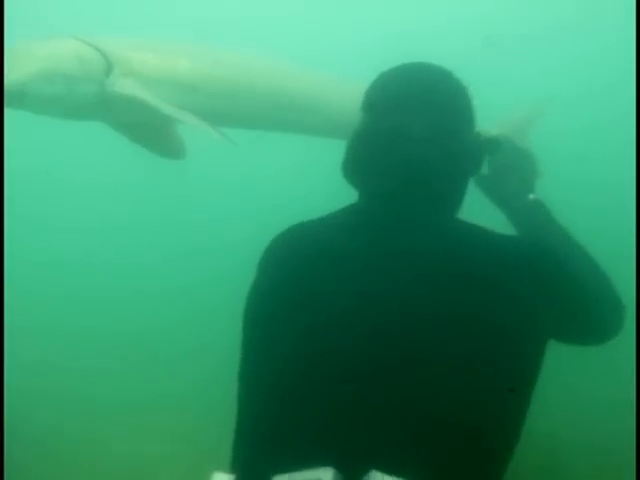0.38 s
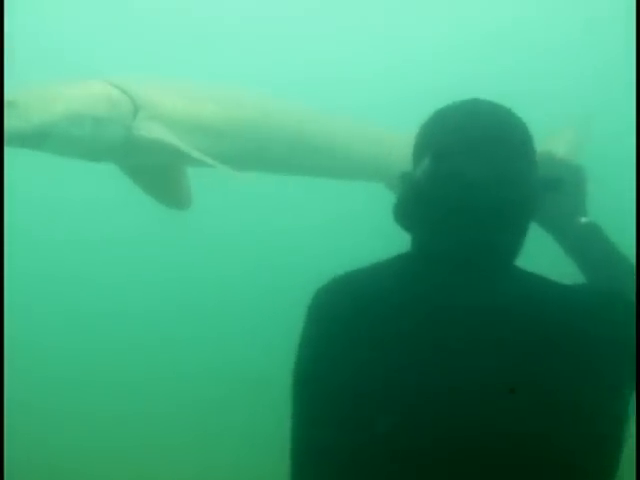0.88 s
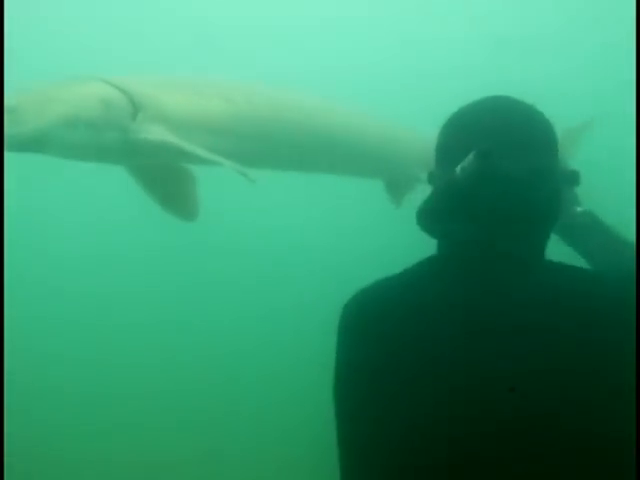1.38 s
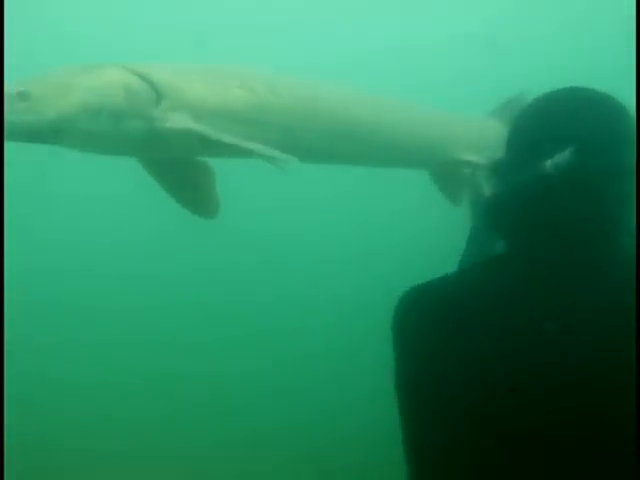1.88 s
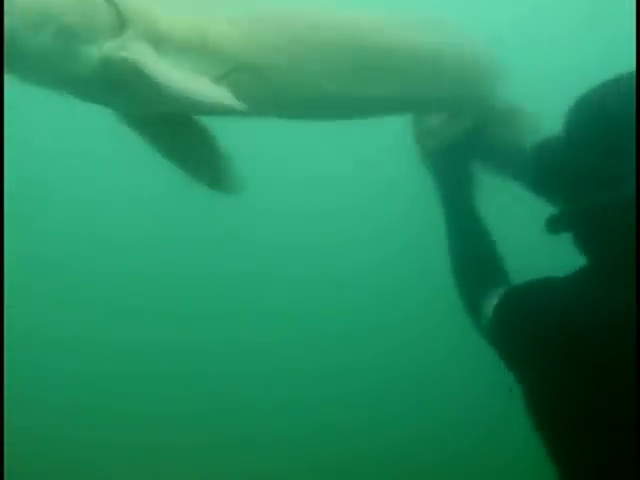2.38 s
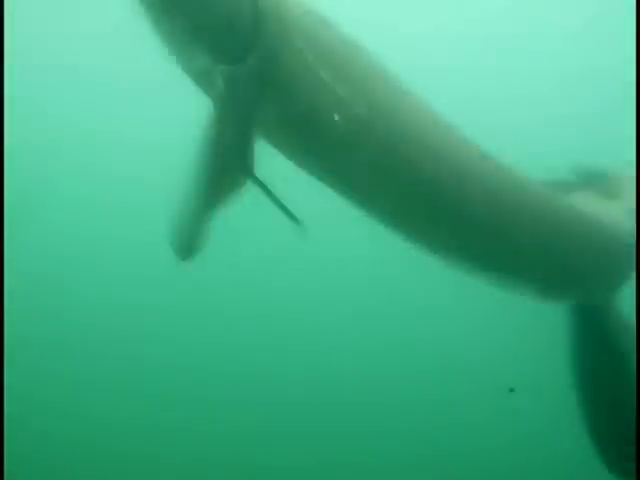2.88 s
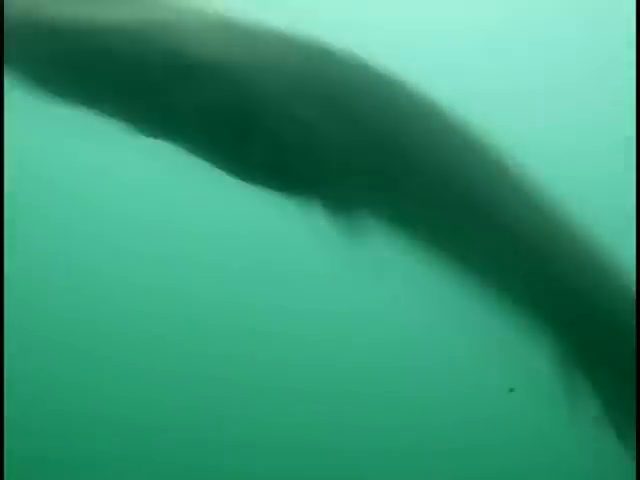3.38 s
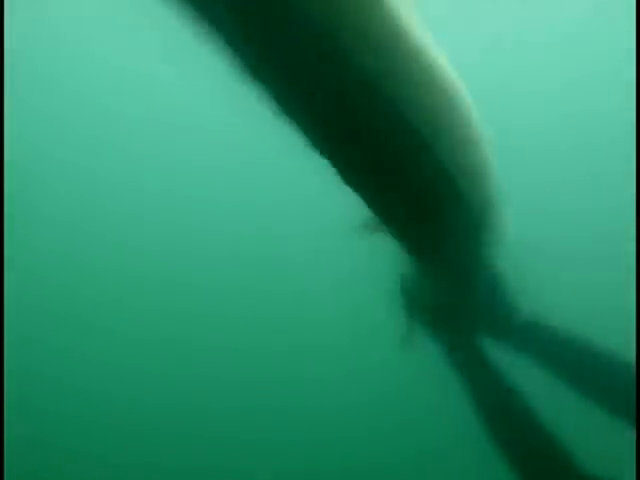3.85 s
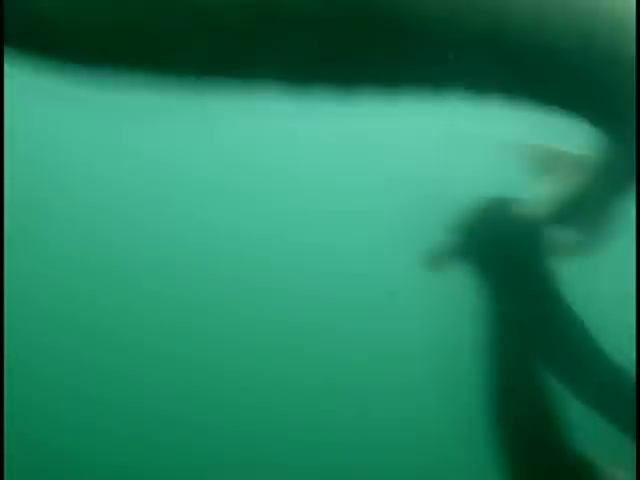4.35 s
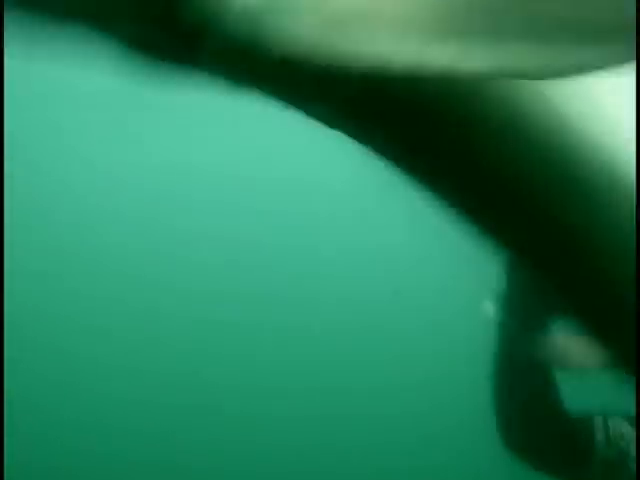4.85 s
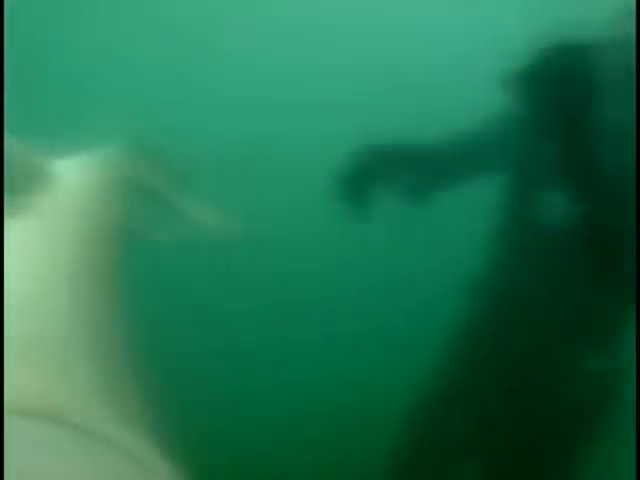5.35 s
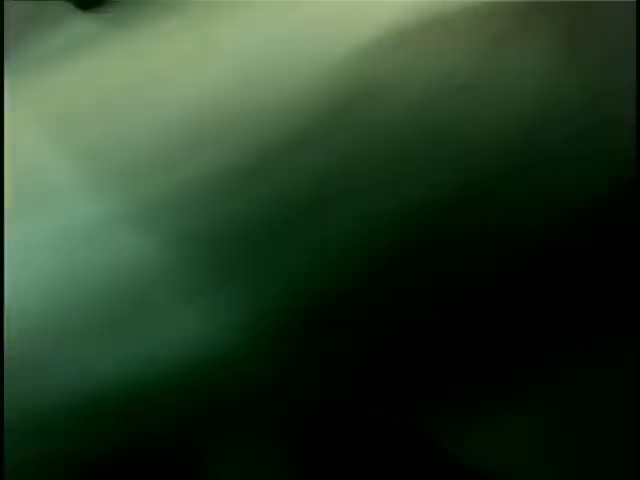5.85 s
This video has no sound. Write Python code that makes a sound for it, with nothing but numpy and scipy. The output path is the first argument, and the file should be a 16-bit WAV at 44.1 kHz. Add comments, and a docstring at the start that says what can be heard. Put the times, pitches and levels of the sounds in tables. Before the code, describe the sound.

Near-silent underwater hiss and faint whine give way to small clicks and bubbly plinks, then hard, distorted bumps and scrapes on a camera's casing.

```python
"""Under water, in a sealed camera housing beside a diver holding a large thrashing fish.
At first mostly the microphone's hiss, a thin electronic whine and slow surges, all coloured noise and a sine;
then the housing is ticked, rubbed, scraped and shoved harder and harder: rough forces ring its modes,
over faint random ticks all through. Bubbles, small pings of the housing's shell, and a fizz of tiny
bubbles are fading sines whose pitch wavers; shoves and the low ringing after the hardest are plainer ones."""
import sys
import numpy as np
from scipy import signal
from scipy.fft import rfft, irfft, next_fast_len
from scipy.io import wavfile
from scipy.ndimage import uniform_filter1d, map_coordinates

SR = 44100
rng = np.random.default_rng(int(sys.argv[2]) if len(sys.argv) > 2 else 0)


def field_ratio(decibels):
    """Amplitude ratio for a level in dB (20 dB per decade); scalars and array-likes work."""
    return 10 ** (np.asarray(decibels, dtype=float) / 20)


def to_wav(s):
    """Save 16-bit WAV."""
    ch = np.atleast_2d(s).T  # columns
    pcm = np.round(np.clip(ch, -1, 1) * 32767)  # PCM
    wavfile.write(sys.argv[1], SR, pcm.astype(np.int16))


N = 263718

# light handling under the strokes: (t/s, strength/dB)
HANDLING = [(2.4, -96), (2.53, -83), (2.6, -75.5), (2.7, -71.5), (2.88, -74.5), (3.05, -72), (3.18, -76.5),
            (3.45, -71), (3.78, -69), (4.03, -71.5), (4.3, -57), (4.37, -55.5), (4.52, -67), (4.81, -63),
            (5.0, -70), (5.23, -71.5), (5.4, -47), (5.56, -54), (5.64, -49), (5.89, -58.5), (5.96, -40)]
# shoves against the housing, and the low ringing after the hardest ones:
# (t/s, level/dB, f/Hz, time to fade by 60 dB/s)
SHOVES_AND_RINGING = [(2.127, -51, 101, 0.13), (3.115, -48.5, 70, 0.13), (3.57, -44, 128, 0.055),
                      (3.581, -46.5, 323, 0.085), (3.592, -42, 100, 0.12), (4.885, -41, 145, 0.053),
                      (5.081, -40.5, 108, 0.087), (5.28, -10.5, 175, 0.049), (5.28, -12.5, 420, 0.03),
                      (5.437, -22, 189.6, 0.19), (5.3, -26.5, 205, 0.07), (5.424, -0.5, 450, 0.012),
                      (5.427, -22, 71, 0.13), (5.877, -19.5, 203, 0.0079), (5.9124, -8, 95, 0.018),
                      (5.929, -10, 480, 0.013)]


def unit(x):
    """Scales x to rms 1."""
    return x / np.sqrt(np.mean(x ** 2) + 1e-20)


def curves(rows):
    """Joins the rows by straight lines: one value per sample for each column after the time."""
    s, *cols = np.transpose(rows)
    return [np.interp(np.arange(N) / SR, s, c) for c in cols]


def filtered(x, response):
    """Filters x by a complex response of frequency."""
    m = next_fast_len(N + SR // 4)
    hz = np.fft.rfftfreq(m, 1 / SR)
    return irfft(rfft(x, m) * response(hz), m)[:N]


def coloured(spectrum):
    """Noise of rms 1 with a given spectrum."""
    f, db = np.transpose(spectrum)

    def response(hz):
        return field_ratio(np.interp(np.log(hz + 1), np.log(f), db))
    return unit(filtered(rng.standard_normal(N), response))


def patchy(depth_db):
    """Noise of rms 1 whose colour changes every few ms, as when a point of contact moves."""
    z = signal.stft(rng.standard_normal(N), nperseg=256)[2]
    field = uniform_filter1d(rng.standard_normal(z.shape), size=4, axis=0)  # smooth over frequency
    field = uniform_filter1d(field, size=3, axis=1)  # and over time
    return unit(signal.istft(z * field_ratio(depth_db * unit(field)), nperseg=256)[1][:N])


def jolts(rate, spread_db, last):
    """Stick and slip: uneven jolts of a few ms, rms 1; rate is per second, last is in seconds."""
    kicks = (rng.random(N) < rate / SR) * field_ratio(spread_db * rng.standard_normal(N))
    t = np.arange(SR // 40) / SR
    jolt = t / last * np.exp(-t / last)
    return unit(signal.fftconvolve(kicks, jolt)[:N])


def ring(force, modes, blows=0):
    """A random force of the given envelope, and any clean blows, ring the modes; steady force 1 gives rms 1."""
    def response(f):
        h = 0
        for k, (centre, width, db) in enumerate(modes):
            resonance = 1j * f * width / (centre * centre - f * f + 1j * f * width)
            h = h + (-1) ** k * field_ratio(db) * resonance  # neighbours have opposite signs
        h = h / (1 + 1j * f / modes[-1][0]) ** 2  # little passes above the highest mode
        return h / np.sqrt(np.mean(abs(h) ** 2))
    return filtered(force * patchy(depth_db=3.3) + blows, response)


def damped(rows, attack, glide, waver):
    """Decaying sines with a soft start and a gliding pitch; waver (radians) makes pitch and level wander."""
    out, t = np.zeros(N + SR), np.arange(SR // 4) / SR
    knots = rng.standard_normal((len(rows), 2, 24))
    for (s, db, hz, t60), wander in zip(rows, knots):
        turn, swell = (waver * map_coordinates(v - v[0], [t * 80]) for v in wander)  # 80 knots a second
        phase = 2 * np.pi * hz * t * (1 + glide * t / t60) + turn
        tone = np.sin(phase) * (1 - np.exp(-t * hz / attack))  # attack is in cycles
        out[round(s * SR):][:len(t)] += field_ratio(db - 60 * t / t60 + 2 * swell) * tone
    return out[:N]


def microphone_hiss():
    """The microphone's own steady noise."""
    # spectrum of the hiss: (f/Hz, relative level per Hz/dB)
    hiss = [(20, -32), (58, -40), (128, -3.5), (224, -7), (616, -4.5), (2440, -13.5), (5500, -15),
            (6700, -17.5), (10500, -19), (11600, -33), (13000, -23), (15600, -28), (16200, -44)]
    return field_ratio(-66) * coloured(hiss)  # rms level in dB


def electronic_whine():
    """The electronics give a thin steady sine."""
    # the whine: (f/Hz, rms level/dB)
    hz, db = (5880, -78)
    return np.sqrt(2) * field_ratio(db) * np.sin(2 * np.pi * hz * np.arange(N) / SR)


def surge():
    """The flow, and a wake at each shove or ringing, sway the housing and make its trapped air boom."""
    # water flowing round the housing: (t/s, flow/dB)
    flow = [(0, -89), (0.9, -76), (1.15, -75), (1.32, -77), (1.9, -75), (2.11, -72), (2.41, -78),
            (2.75, -68.5), (4.05, -74), (4.3, -54), (4.56, -63), (4.68, -56), (4.83, -71), (5.15, -60.5),
            (5.36, -33.5), (5.56, -54.5), (5.73, -41.5), (5.84, -63), (5.98, -53)]
    # spectrum of the sway: (f/Hz, relative level per Hz/dB)
    swell = [(15, 2.5), (45, -4), (80, -10), (130, -55), (300, -90)]
    # modes of the housing and of the air trapped in it: (f/Hz, width/Hz, relative level/dB)
    air = [(107, 58, -4), (166, 51, 0.5), (283, 380, -3)]
    wake_db, wake_rise_s, wake_t60_s = -18, 0.0053, 0.11  # wake_db is relative to the row's level
    sway_s, sway_db, sway_power = 0.17, -15.5, 0.73
    still_boom_db = -73.5  # the trapped air never falls quiet
    t, push = np.arange(N) / SR, field_ratio(curves(flow)[0])
    for s, db, *_ in SHOVES_AND_RINGING:
        since = np.clip(t - s, 0, None)
        rise = 1 - np.exp(-since / wake_rise_s)
        push = push + field_ratio(db + wake_db - 60 * since / wake_t60_s) * rise
    # the heavy housing follows the push slowly and less than in proportion
    sway = abs(uniform_filter1d(push, round(sway_s * SR))) ** sway_power
    boom = np.hypot(push, field_ratio(still_boom_db)) * unit(ring(1, air))
    return field_ratio(sway_db) * sway * coloured(swell) + boom


def fizz():
    """Tiny bubbles squeezed out by the handling: rows for short pips at random moments."""
    pips_per_s, middle_hz, fade_cycles = 60, 3000, 70
    loudest_db, spread_db = 19, 12  # the loudest pip over the handling, and the range below it
    when, pitch, size = rng.random((round(pips_per_s * N / SR), 3)).T
    s = when * N / SR
    db = np.interp(s, *np.transpose(HANDLING)) + loudest_db - spread_db * size
    hz = middle_hz * 2 ** (2 * pitch - 1)  # up to an octave either way
    return list(zip(s, db, hz, fade_cycles / hz))


def bubbles_and_pings():
    """Bubbles, small pings of the housing's shell, and fizz: fading sines, sinking and wandering in pitch."""
    # bubbles and small pings of the shell: (t/s, level/dB, f/Hz, time to fade by 60 dB/s)
    rings = [(1.165, -55, 289, 0.22), (1.115, -52, 170, 0.047), (1.222, -47.5, 282, 0.052),
             (1.431, -46.5, 289, 0.089), (2.166, -45, 1870, 0.012), (2.51, -54, 950, 0.13),
             (2.566, -50, 3180, 0.04), (3.275, -54.5, 1205, 0.11), (3.36, -52, 2100, 0.024),
             (3.425, -54, 2850, 0.096), (3.909, -44.5, 3170, 0.02), (5.050, -44.5, 2910, 0.031),
             (5.150, -42.5, 2975, 0.012), (2.81, -43.5, 423, 0.044), (3.388, -46.5, 290, 0.065),
             (3.678, -51.5, 1045, 0.22), (3.726, -44, 1107, 0.14), (3.726, -42, 1423, 0.1),
             (3.806, -45, 660, 0.054), (3.860, -44, 650, 0.12), (3.860, -40.5, 1280, 0.08),
             (3.868, -50, 897, 0.23), (3.81, -53, 816, 0.11), (3.727, -51, 2010, 0.033),
             (3.958, -51.5, 1060, 0.13), (4.446, -26.5, 467, 0.074), (4.618, -34.5, 950, 0.037)]
    return damped(rings + fizz(), attack=0.22, glide=-0.07, waver=0.3)


def shoves_and_ringing():
    """Shoves, and the low ringing after the hardest ones, are fading sines that sink in pitch."""
    return damped(SHOVES_AND_RINGING, attack=0.02, glide=-0.1, waver=0)


def colour(base_db, db, bright_db):
    """How a contact shares its force between case, shell, rasp and squeak, in dB."""
    # share of the brightness for case, shell, rasp, squeak: [dB per dB]
    # a bright contact skips the case and feeds the rasp and squeak
    bright_share = [-0.92, 0.21, 0.53, 0.73]
    middling_db = -42
    # firm pressure damps rasp and squeak: dB lost per dB above middling
    loss = np.array([[0], [0], [0.2], [0.31]])
    shared = np.array(base_db) + np.array(bright_share) * bright_db
    return shared[:, None] - loss * (db - middling_db)


def faint_tick_power():
    """Faint random ticks all through, whether or not the housing is handled; they feed the rasp modes only."""
    power = np.zeros((4, N))
    power[2] = field_ratio(2 * -82) * jolts(35, spread_db=2, last=.002) ** 2
    return power


def handling_power():
    """Light handling drags unevenly over the surface."""
    # case, shell, rasp, squeak against the strength of a middling contact: [dB]
    base_db = [1.5, -2.5, -6.5, -21.5]
    t = np.arange(N) / SR
    strength_db, = curves(HANDLING)
    drag = (t > HANDLING[0][0]) * (1 + .55 * jolts(110, spread_db=3, last=.0015))
    return field_ratio(2 * (strength_db + colour(base_db, strength_db, 0))) * drag ** 2


def stroke_power():
    """Scraping strokes press with a changing strength, roughened by stick and slip."""
    # scraping strokes: (t/s, length/ms, strength at start/dB, strength at end/dB, brightness/dB)
    strokes = [(2.509, 58, -70.5, -70, -12.5), (2.621, 27, -59.5, -64, -3), (2.685, 68, -68, -70, -10.5),
               (2.797, 14.7, -48.5, -56, -2.5), (3.251, 33, -65.5, -63, 3), (3.413, 23, -53, -60, 7),
               (4.073, 70, -54.5, -66, 3), (4.137, 85, -48, -52.5, 8.5), (4.204, 34, -49, -38, -1.5),
               (4.235, 37, -38.5, -37.5, 2), (4.272, 21, -36, -55, -4), (4.414, 36, -49, -40, -2),
               (4.449, 36, -35.5, -51, -1.5), (4.593, 37, -50.5, -58, 12.5), (4.799, 36, -54, -61.5, -8),
               (5.201, 58, -41, -50.5, -2.5), (5.256, 25, -39, -37, -10.5), (5.2797, 21.3, -19, -21.5, 1),
               (5.308, 22.5, -37, -36.5, -4), (5.335, 47, -49, -46, -6.5), (5.4235, 44.6, -21, -25, 2),
               (5.4705, 29.6, -35, -47, -1), (5.6023, 12.3, -36, -28, 6.5), (5.655, 62, -46.5, -30, 1),
               (5.697, 53.6, -25, -24, 0.5), (5.757, 44, -34.5, -42, 5.5), (5.799, 32, -35, -30.5, 3.5),
               (5.8427, 9.2, -28.5, -43, -6), (5.897, 11, -38, -54, -13.5), (5.9119, 26.8, -29, -29, -3.5)]
    # case, shell, rasp, squeak against the strength of a middling contact: [dB]
    base_db = [-0.5, 0, -5.5, -14]
    t, power = np.arange(N) / SR, np.zeros((4, N))
    for start, ms, first_db, last_db, bright_db in strokes:
        end = start + ms / 1000
        k = slice(round(start * SR), min(round(end * SR) + 400, N))
        db = np.interp(t[k], [start, end], [first_db, last_db])
        db -= 3000 * np.clip(t[k] - end, 0, None)  # let go: 3 dB per ms
        db -= 15 * np.exp((start - t[k]) / .001)  # the skin lands within a few ms
        power[:, k] += field_ratio(2 * (db + colour(base_db, (first_db + last_db) / 2, bright_db)))
    return power * unit(1 + .4 * jolts(500, spread_db=2.5, last=.0007)) ** 2


def tick_force():
    """A hard contact is a burst of grit with a clean blow inside it that rings case and shell."""
    # short hard contacts: (t/s, strength/dB, brightness/dB)
    ticks = [(0.932, -44.5, -7), (1.042, -50.5, -9), (1.1304, -47.5, -9), (2.5221, -41, -6),
             (2.627, -37, -5), (2.6332, -34, 0), (2.679, -43.5, 14.5), (2.7872, -42.5, -13),
             (2.8453, -37, 14), (2.9239, -42, -5.5), (2.94, -48, -2), (3.002, -38, -1), (3.0269, -40.5, 0),
             (3.497, -44, 1), (3.6524, -41, -3), (3.72, -41.5, 1), (3.7905, -46, 9), (3.858, -46.5, 7),
             (4.067, -49, 12), (4.129, -33.5, 11), (4.2721, -11.5, -2), (4.3773, -37.5, 0),
             (4.606, -34, -5), (4.6189, -29.5, 3), (4.671, -39.5, -5), (4.726, -35, 10), (4.7578, -42, -3),
             (4.792, -31.5, -2), (4.984, -39, -2), (5.006, -37, -7), (5.078, -28, -2), (5.124, -54, 29),
             (5.183, -38.5, 3), (5.2073, -27, 8.5), (5.2363, -24, -6), (5.2599, -21.5, -15),
             (5.2892, -2, 0), (5.3075, -10, -3), (5.318, -15.5, -1), (5.382, -23.5, -1), (5.393, -28, 0),
             (5.4245, -3, -8.5), (5.4382, -11, -4), (5.4468, -10, -11), (5.451, -20, -7), (5.464, -24, -3),
             (5.4812, -13.5, 1.5), (5.4965, -19.5, 3), (5.6021, -6.5, 7), (5.6588, -24, 10),
             (5.67, -16.5, -5), (5.6908, -3.5, -1), (5.7246, -4, -1.5), (5.738, -6.5, 16),
             (5.758, -15.5, 22.5), (5.8, -21, 1), (5.898, -28, -17.5), (5.9283, -14.5, -8),
             (5.9356, -14.5, 11.5)]
    # case, shell, rasp, squeak against the strength of a middling contact: [dB]
    base_db = [-17, -13.5, -9, -32]
    blow_db = 17  # the blow over the grit
    u = np.arange(SR // 50) / SR / 0.00086
    burst = (u * np.exp(1 - u)) ** 2  # the contact lasts about 4 ms
    power, blows = np.zeros((4, N)), np.zeros((4, N))
    sides = rng.choice([-1, 1], len(ticks))  # push or pull
    for (s, db, bright_db), side in zip(ticks, sides):
        k = round((s - .0004) * SR)
        shared_db = db + colour(base_db, db, bright_db)
        power[:, k:k + len(u)] += field_ratio(2 * shared_db) * burst
        blows[:2, round(s * SR)] = side * field_ratio(blow_db + shared_db[:2, 0])
    return power, blows


def contacts():
    """Strokes, ticks and handling all drive the case, the shell, and the rasp and squeak of the surface."""
    # modes of the housing, low to high, in four groups: (f/Hz, width/Hz, relative level/dB)
    case = [(343, 160, -7), (450, 64, 3), (700, 190, -1), (950, 152, 3), (1447, 435, -0.5)]
    shell = [(1540, 125, 5.6), (2306, 430, 6.8), (2850, 233, 12.2), (3496, 570, 8.93), (5030, 2360, 1.6)]
    rasp = [(5290, 840, -1), (6870, 1600, -0.5), (8540, 1500, 3), (10230, 1620, -0.5), (14370, 1000, -8)]
    squeak = [(8350, 350, 0)]
    grit, blows = tick_force()
    power = faint_tick_power() + handling_power() + stroke_power() + grit
    groups = zip(power, blows, (case, shell, rasp, squeak))
    return sum(ring(np.sqrt(abs(p)), modes, b) for p, b, modes in groups)


def scene():
    """The surge of the water, bubbles and pings, shoves and their ringing, and the contacts."""
    return (surge() + bubbles_and_pings() + shoves_and_ringing() + contacts())[None]


def top_cut(x):
    """Nothing passes above the cut-off."""
    return signal.sosfilt(signal.butter(12, 16820, fs=SR, output="sos"), x)


def record(dry):
    """The microphone adds its hiss, the electronics a thin steady whine; the hardest blows saturate."""
    wet = dry + microphone_hiss() + electronic_whine()
    clipped = wet / (1 + abs(wet / .74) ** 6) ** (1 / 6)  # bends over towards 0.74
    return top_cut(clipped)


dry = scene()
out = record(dry)
to_wav(out)
```